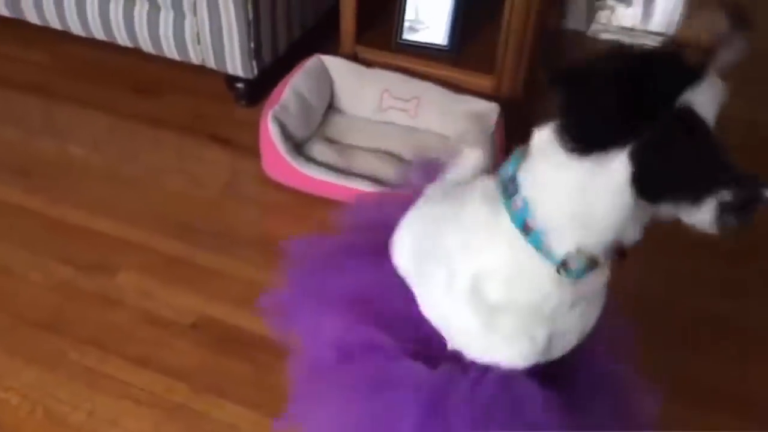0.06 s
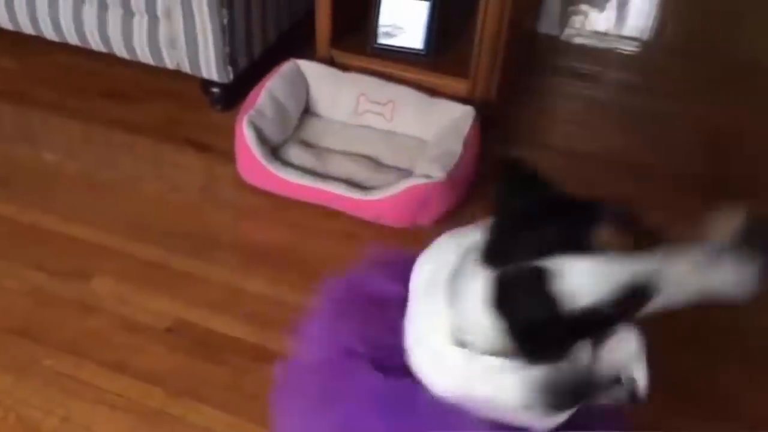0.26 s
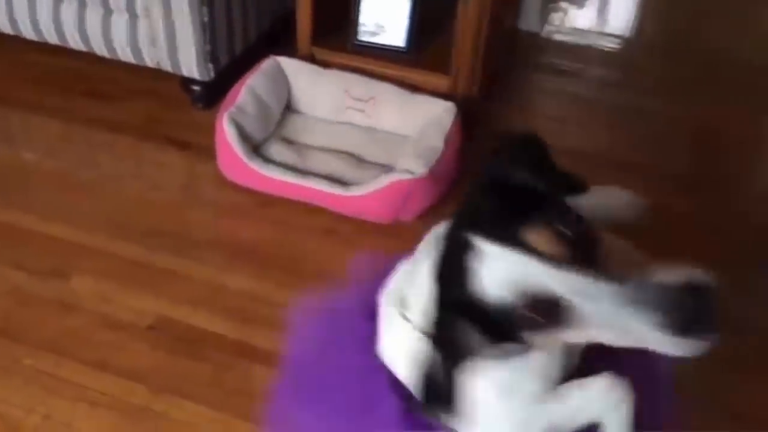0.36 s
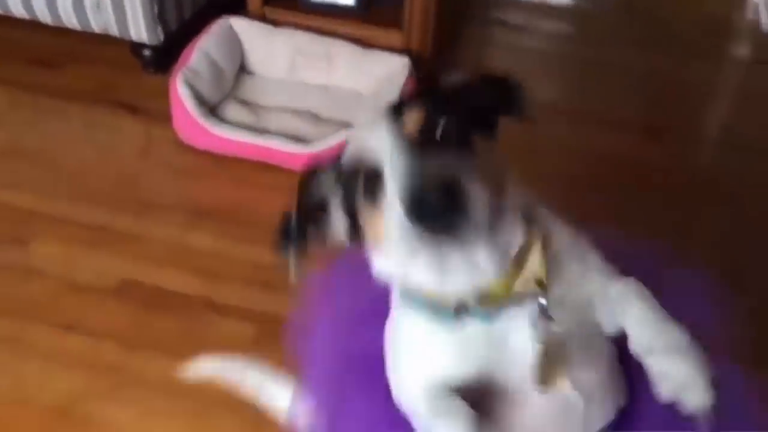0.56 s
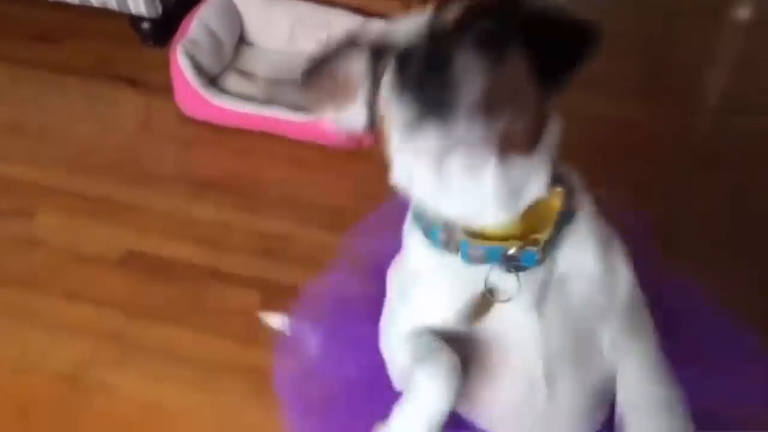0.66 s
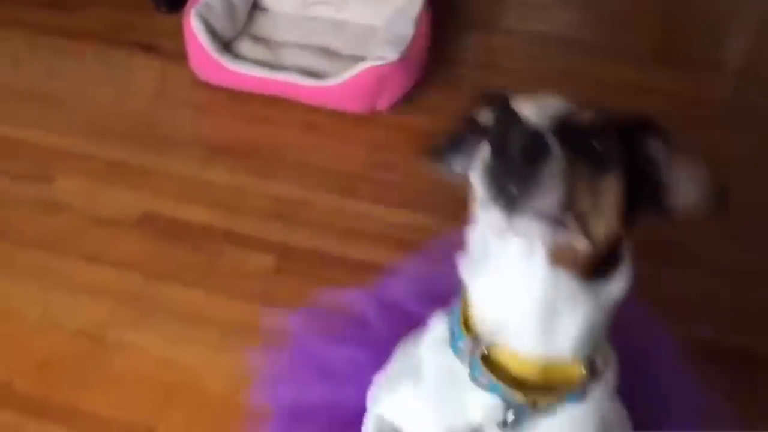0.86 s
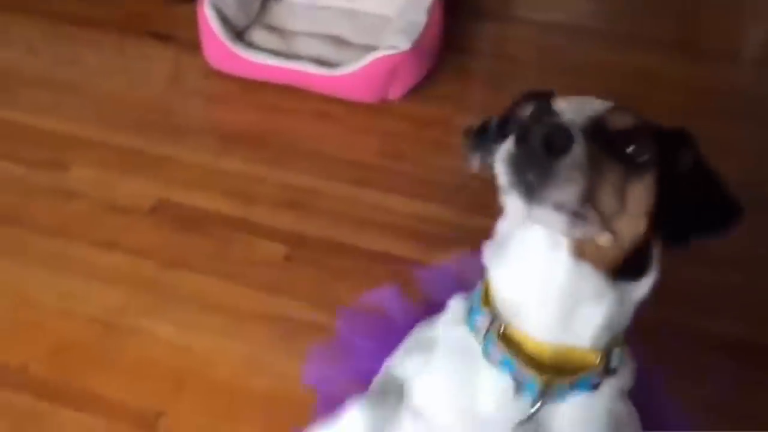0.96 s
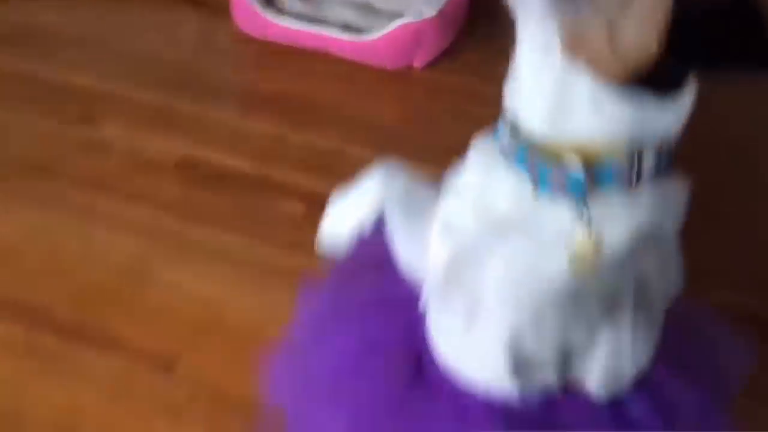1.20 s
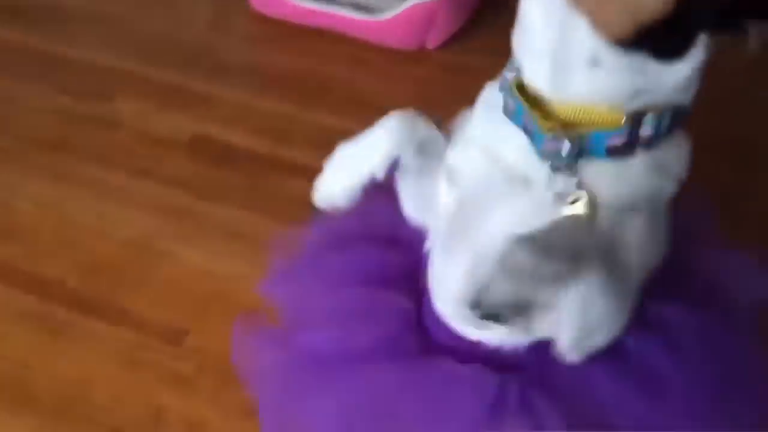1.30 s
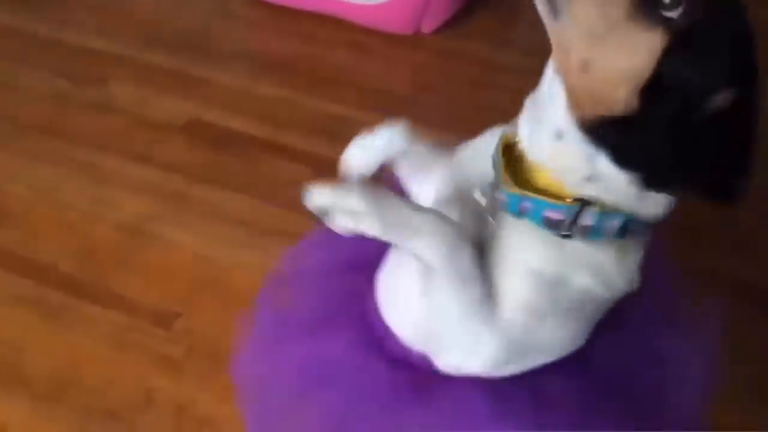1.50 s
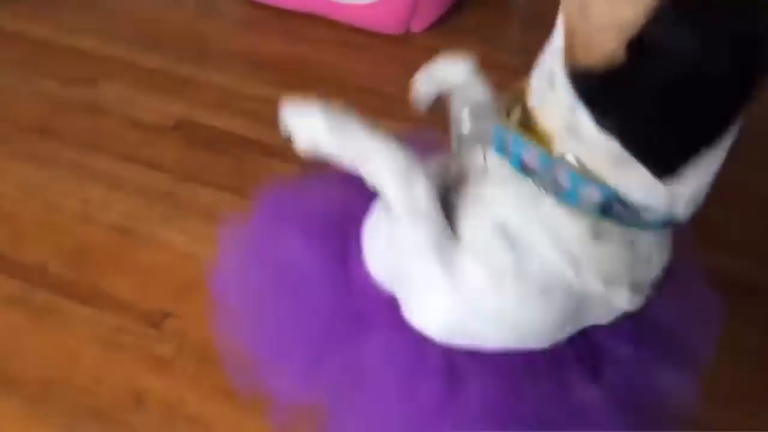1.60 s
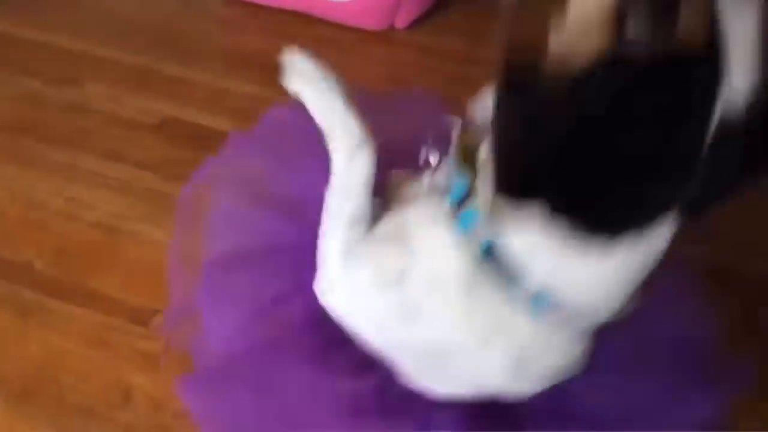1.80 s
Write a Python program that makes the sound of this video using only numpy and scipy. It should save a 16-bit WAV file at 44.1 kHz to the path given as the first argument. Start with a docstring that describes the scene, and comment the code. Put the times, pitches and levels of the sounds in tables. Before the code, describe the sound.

A small dog's claws click on hardwood, close by in a lively room. The tail of an earlier tap opens it; sharp clusters strike around 0.2, 0.3 and 0.5 seconds, with lighter taps and scuffs at 0.65 and ticks from 0.85 to 0.93. Thin, high collar tag tinkles fill the gap until another clatter at 1.43-1.5, then near quiet with faint ticks near 1.75 over soft rumble.

```python
"""Small dog dancing on hardwood

A small dog hops and turns on its hind legs on a living-room floor, close to the camera's microphone.
Each claw strikes as a short run of spikes with a brief ring, and knocks the board into decaying noise and a tone.
Pads thud as low decaying resonances, paws scuff as grainy noise, and a collar tag tinkles in high modes.
The room reverberates for about half a second, over low rumble noise and a faint two-tone hum."""
import sys
import numpy as np
from scipy import signal
from scipy.fft import rfft, irfft
from scipy.io import wavfile
from scipy.ndimage import uniform_filter1d

SR = 44100
rng = np.random.default_rng(int(sys.argv[2]) if len(sys.argv) > 2 else 0)


def digitize_waveform(pressure):
    """Quantize a signal to 16-bit integers and store it at the path in sys.argv[1].

    Rows of a 2-D input are taken as channels; values are limited to [-1, 1].
    """
    field = np.atleast_2d(pressure).T
    bounded = np.clip(field, -1, 1)
    quanta = np.round(bounded * 32767).astype(np.int16)
    wavfile.write(sys.argv[1], SR, quanta)


N = 81585  # samples

# claw contacts: start_s, click_db, knock_db (on top of KNOCK_DB), body_db (relative to the knock),
# board_hz (board resonance), chatter_ms, room_db (reverberation relative to direct sound)
CLAW_CONTACTS = [ (-.11, -16.5, -22.5, -2.5, 2054, 1, 3), (.2027, -16.5, -30, -7, 5040, 2.5, -16),
                 (0.2074, -14.5, -31.5, -1, 1800, .2, -9), (.2096, -20, -27.5, -3.5, 2457, 0.41, 8),
                 (0.2996, -17.5, -23.5, -2, 1482, 2.25, 0.5), (0.3033, -20, -25, 1, 884, 2, -0.5),
                 (0.3163, -31.5, -29.5, -6.5, 2500, 3.5, 0), (0.5221, -15, -23, -9.5, 2464, 1.6, -6),
                 (0.5252, -18, -25, -11, 1330, 0.27, -11), (0.5294, -20, -28, 1.5, 930, 0.37, 0.5),
                 (0.5391, -24, -38, 2, 3750, 1.4, 1.5), (0.6425, -19.5, -33.5, -9, 3380, 2.53, -5.5),
                 (0.6597, -30, -39, 5, 950, 0.83, 6), (.674, -32.5, -35.5, 2.5, 1700, 1.6, -1),
                 (0.7008, -47, -30.5, 5.5, 1430, 2.8, -3), (0.807, -41, -61, -13, 2940, 2, 5),
                 (0.8499, -21, -29, -3, 2870, 2.1, -3), (0.8667, -29.5, -45, -3, 1416, 1, 4.5),
                 (0.9177, -18.5, -33.5, -4, 2650, 1.1, -0.5), (0.9255, -25.5, -36.5, 0.5, 1043, .3, -7),
                 (0.9343, -28, -35, 1, 3850, 4, 0), (1.3293, -30.5, -40.5, -6.5, 4030, 0.28, -3.5),
                 (1.435, -27, -46, -6, 1900, .4, -2), (1.4393, -18, -28, -11, 1936, 1.56, 0),
                 (1.4479, -16.5, -31.5, -9, 1322, .3, 1), (1.4565, -27, -41, -7, 3500, 2.7, -1.5),
                 (1.4654, -20.5, -30.5, -2.5, 2240, 0.43, -2.5), (1.483, -27.5, -39, -6, 2450, 1.8, -6),
                 (1.507, -36.5, -36, -1, 1530, 0.9, -3.5), (1.728, -45.5, -60, 3, 3320, 0.91, -21),
                 (1.734, -39.5, -63, 6, 3360, 0.63, 3.5), (1.787, -58, -43, 3.5, 1796, 1.4, 1.5)]
# spectrum of a claw click: frequency_hz, level_db
CLICK_SPECTRUM = [(200, -22.5), (1500, -9.5), (3500, -7.5), (5500, -1), (8500, 0), (11000, -7),
                  (13500, -17.5), (16000, -35)]
# spectrum of the knocked board: frequency_hz, level_db
BOARD_SPECTRUM = [(100, -20), (600, -22), (1300, -15.5), (1900, -2), (2600, 1), (4000, 4.5), (8000, -11),
                  (16000, -40)]
# spectrum of the low body under the knock: frequency_hz, level_db
BODY_SPECTRUM = [(100, -22), (300, 2), (550, -7), (900, -0.5), (1400, 0.5), (2200, -16), (5000, -32),
                 (16000, -47)]
# paw pads landing: start_s, level_db (before the attack and decay), pitch_hz (the floor's thud)
PAD_LANDINGS = [(.14, -43, 152.7), (0.203, -39.5, 202.5), (.21, -35, 345), (.301, -34, 578),
                (.313, -48, 330), (.523, -35, 524), (0.637, -43.5, 164), (0.667, -64, 423),
                (0.701, -45, 320.5), (.885, -45.5, 129), (.918, -45, 276.6), (0.945, -37.5, 162.3),
                (1.441, -37.5, 321.5), (1.445, -40, 204), (1.471, -36.5, 284), (1.55, -47.5, 119.7),
                (1.656, -50.5, 122), (1.787, -42.5, 374)]
# paws dragging: start_s, length_s, level_db (before the swell)
PAW_SCUFFS = [(0.186, 0.057, -53.5), (0.549, 0.086, -52), (.63, 0.042, -41), (.68, 0.053, -45),
              (0.743, 0.079, -54.5), (1.43, 0.021, -47.5), (1.784, 0.12, -71)]
# spectrum of a scuff before its grain: frequency_hz, level_db
SCUFF_SPECTRUM = [(150, -35), (400, -9), (900, -7.5), (1600, -5.5), (3000, -10.5), (7000, -13),
                  (15000, -30)]
# collar tag strikes: start_s, upper_db, upper_t60_s, lower_db, lower_t60_s, clink_db (on top of the clink's modes)
TAG_STRIKES = [(.428, -46.5, 0.27, -60, 0.25, -54), (.599, -47, .06, -61, .08, -53),
               (.801, -67, .08, -70, .08, -66), (0.903, -59, .06, -72, .06, -50),
               (1.031, -56, 0.036, -51, 0.12, -45), (1.119, -50, 0.04, -52, 0.35, -52.5),
               (1.221, -51.5, .1, -57, 0.074, -58), (1.3835, -65, 0.057, -46.5, 0.091, -62),
               (1.543, -46, .08, -54, .2, -49), (1.551, -51, 0.12, -59, .25, -46),
               (1.785, -62, 0.11, -70, .06, -63)]
# short modes of the tag's clink: frequency_hz, level_db (before a random spread), t60_s
CLINK_MODES = [(5500, -15, 0.035), (6864, 6, 0.039), (9800, -13, 0.19), (10270, -3, 0.069),
               (11230, -4, 0.069), (12700, 2, 0.047), (13500, -14, 0.024)]
# reverberation time of the room: frequency_hz, t60_s
ROOM_DECAY = [(150, 0.66), (500, 0.45), (1500, 0.46), (4000, 0.44), (8000, 0.39), (14000, 0.41)]
# spectrum of the reverberation before it decays: frequency_hz, level_db
ROOM_SPECTRUM = [(150, 5), (1000, 0.5), (2500, 3.5), (6000, 0.5), (10000, -4), (15000, 3)]
# spectrum of the house rumble: frequency_hz, level_db (relative)
RUMBLE_SPECTRUM = [(20, -23), (42, -2.5), (90, 0), (130, 1), (220, -5.5), (350, -12.5), (500, -20),
                   (1000, -26.5), (2500, -29), (7000, -34), (15000, -41.5)]
# hum tones: frequency_hz, level_db (rms)
HUM_TONES = [(119, -74.5), (726.7, -77.5)]

# t60: seconds to fall 60 dB
CHATTER_GAP_MS, CHATTER_LOSS_DB = 0.45, 5  # mean gap; loss over the whole chatter
CLAW_RING_DB, CLAW_RING_T60_S = -13.5, 0.018
KNOCK_DB, BOARD_T60_S, BODY_T60_S = -11.5, 0.034, 0.032
RESONANCE_DB, RESONANCE_T60_S = 0.5, 0.043
PAD_ATTACK_S, PAD_CYCLES, PAD_WIDTH = 0.0073, 25, 0.2  # cycles to fall 60 dB; width as a share of the pitch
TAG_UPPER_HZ, TAG_LOWER_HZ, TAG_ATTACK_S = 12545, 11620, 0.00043
TAG_TICK_DB, TAG_TICK_T60_S, TAG_ROOM_DB = -2, 0.03, -14.5
ROOM_DELAY_S, ROOM_BUILD_S = 0.0025, 0.0035
ROOM_SAMPLES = SR * 3 // 4
RUMBLE_DB = -58.5  # rms
TOP_HZ = 15400


def claws():
    """A claw rebounds in a quick run of sharp spikes, rings briefly and knocks the board."""
    out = np.zeros(N)
    t = np.arange(SR // 10) / SR
    spike = impulse(CLICK_SPECTRUM)
    for start_s, click_db, knock_db, body_db, board_hz, chatter_ms, room_db in CLAW_CONTACTS:
        gaps_ms = CHATTER_GAP_MS * rng.uniform(0.5, 1.5, size=16)
        times_ms = np.cumsum(gaps_ms) - gaps_ms[0]
        sizes = amp(-CHATTER_LOSS_DB * times_ms / chatter_ms) * (times_ms <= chatter_ms)
        rebounds = np.bincount((times_ms * SR / 1000).astype(int), sizes, len(t))
        click = -signal.fftconvolve(rebounds, spike)[:len(t)]
        ring = amp(CLAW_RING_DB) * noise(CLICK_SPECTRUM, len(t)) * fade(t, CLAW_RING_T60_S)

        board = noise(BOARD_SPECTRUM, len(t)) * fade(t, BOARD_T60_S)
        resonance = mode(t, board_hz, RESONANCE_DB, RESONANCE_T60_S)
        body = amp(body_db) * noise(BODY_SPECTRUM, len(t)) * fade(t, BODY_T60_S)
        knock = amp(KNOCK_DB + knock_db) * (board + resonance + body)
        add(out, start_s, in_room(amp(click_db) * (click + ring) + knock, room_db))
    return out


def pads(spread_db=-8, room_db=-10):
    """A soft landing sets off one low floor resonance and weaker ones around it."""
    out = np.zeros(N)
    t = np.arange(SR // 4) / SR
    for start_s, level_db, pitch_hz in PAD_LANDINGS:
        low_hz, high_hz = pitch_hz / (1 + PAD_WIDTH), pitch_hz * (1 + PAD_WIDTH)
        around = noise([(pitch_hz / 4, -40), (low_hz, 0), (high_hz, 0), (pitch_hz * 6, -60)], len(t))
        thud = np.sin(2 * np.pi * pitch_hz * t) + amp(spread_db) * around
        envelope = (1 - np.exp(-t / PAD_ATTACK_S)) * fade(t, PAD_CYCLES / pitch_hz)
        add(out, start_s, in_room(amp(level_db) * thud * envelope, room_db))
    return out


def scuffs(grain_db=4, room_db=-2):
    """A paw drags over the boards: noise with random grain rises and falls in a half-sine swell."""
    out = np.zeros(N)
    t = np.arange(SR // 5) / SR
    for start_s, length_s, level_db in PAW_SCUFFS:
        # noise smoothed over about 2 ms; grain_db is its rms swing
        roughness = unit(uniform_filter1d(rng.standard_normal(len(t)), size=90))
        grain = amp(grain_db * roughness)
        drag = unit(grain * noise(SCUFF_SPECTRUM, len(t)))
        swell = np.sin(np.pi * np.minimum(t / length_s, 1))
        add(out, start_s, in_room(amp(level_db) * swell * drag, room_db))
    return out


def collar_tag():
    """The metal tag clinks against its ring; two high modes sing on until the fur damps them."""
    out = np.zeros(N)
    t = np.arange(SR // 2) / SR
    attack = 1 - np.exp(-t / TAG_ATTACK_S)
    for start_s, upper_db, upper_t60_s, lower_db, lower_t60_s, clink_db in TAG_STRIKES:
        upper = mode(t, TAG_UPPER_HZ, upper_db, upper_t60_s)
        lower = mode(t, TAG_LOWER_HZ, lower_db, lower_t60_s)
        # each strike excites the short modes a little differently
        clink = sum(mode(t, hz, db + rng.normal(0, 2.2), t60_s) for hz, db, t60_s in CLINK_MODES)
        tick = amp(TAG_TICK_DB) * noise(CLICK_SPECTRUM, len(t)) * fade(t, TAG_TICK_T60_S)
        strike = upper + lower + amp(clink_db) * (clink + tick)
        add(out, start_s, in_room(strike * attack, TAG_ROOM_DB))
    return out


def room_tone():
    """Low rumble of the house as steady coloured noise, with a faint appliance hum of two sines."""
    t = np.arange(N) / SR
    hum = np.zeros(N)
    for hz, level_db in HUM_TONES:
        hum += amp(level_db) * np.sqrt(2) * np.sin(2 * np.pi * (hz * t + rng.random()))
    return amp(RUMBLE_DB) * noise(RUMBLE_SPECTRUM, N) + hum


def in_room(sound, room_db):
    """Direct sound plus a decaying noise tail, drawn at random for each sound."""
    hz, frame_s, bands = signal.stft(noise(ROOM_SPECTRUM, ROOM_SAMPLES), SR, nperseg=256)
    decaying = bands * fade(frame_s, along(ROOM_DECAY, hz)[:, None])
    tail = signal.istft(decaying, SR)[1][:ROOM_SAMPLES]
    since_delay_s = np.maximum(np.arange(ROOM_SAMPLES) / SR - ROOM_DELAY_S, 0)
    tail = tail * (1 - np.exp(-since_delay_s / ROOM_BUILD_S))
    response = amp(room_db) * tail / np.linalg.norm(tail)
    response[0] = 1  # direct sound
    return signal.fftconvolve(sound, response)


def mode(t, hz, db, t60):
    """One decaying partial with a random starting phase."""
    return amp(db) * np.sin(2 * np.pi * (hz * t + rng.random())) * fade(t, t60)


def impulse(spectrum, size=512):
    """The sharpest causal pulse with this spectrum (minimum phase), peak 1."""
    cepstrum = irfft(np.log(amp(along(spectrum, np.fft.rfftfreq(size, 1 / SR)))))
    # fold the cepstrum forward in time, so the energy comes as early as possible
    cepstrum[1:size // 2] *= 2
    cepstrum[size // 2 + 1:] = 0
    pulse = irfft(np.exp(rfft(cepstrum)))
    return pulse / np.abs(pulse).max()


def noise(spectrum, size):
    """Coloured noise of rms 1."""
    gain = amp(along(spectrum, np.fft.rfftfreq(size, 1 / SR)))
    return unit(irfft(rfft(rng.standard_normal(size)) * gain, size))


def fade(t, t60):
    """Exponential decay by 60 dB in t60 seconds (at least 1 ms)."""
    return np.exp(-np.log(1000) * t / np.maximum(t60, 1e-3))


def along(points, hz):
    """Read (Hz, value) points on a log frequency axis."""
    f, value = np.transpose(points)
    return np.interp(np.log(hz + 1), np.log(f + 1), value)


def amp(db):
    """Decibels to gain."""
    return 10 ** (np.asarray(db) / 20)


def unit(x):
    """Scale to rms 1."""
    return x / np.sqrt(np.mean(x ** 2) + 1e-20)


def add(track, start_s, sound):
    """Mix a sound into the track; one that began before time zero enters partway through."""
    start = round(start_s * SR)
    sound, start = sound[max(-start, 0):], max(start, 0)
    track[start:start + len(sound)] += sound[:max(N - start, 0)]


def scene():
    """Dog, floor and room tone summed at one microphone."""
    return (claws() + pads() + scuffs() + collar_tag() + room_tone())[None]


def record(dry):
    """A steep elliptic low-pass: the camera keeps almost nothing above its band limit."""
    return signal.sosfilt(signal.ellip(10, 0.1, 90, TOP_HZ, fs=SR, output="sos"), dry)


dry = scene()
out = record(dry)
digitize_waveform(out)
```